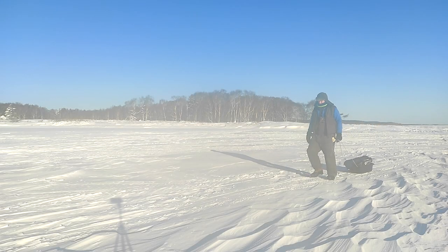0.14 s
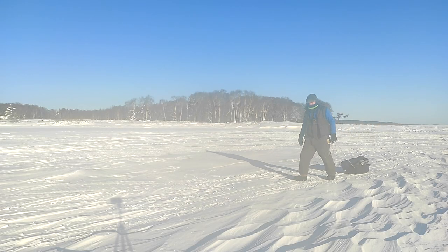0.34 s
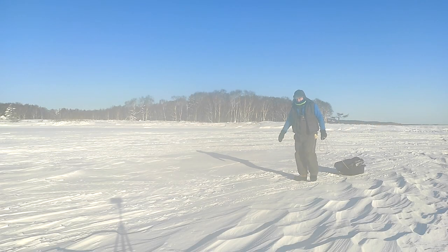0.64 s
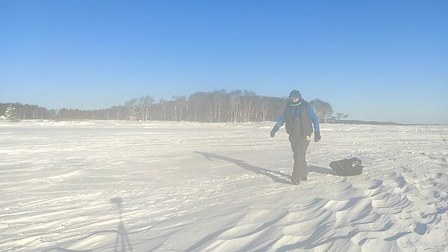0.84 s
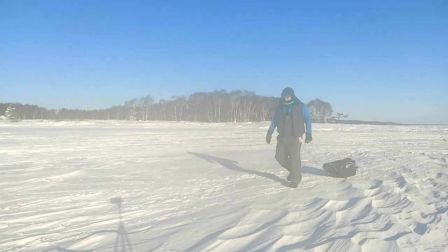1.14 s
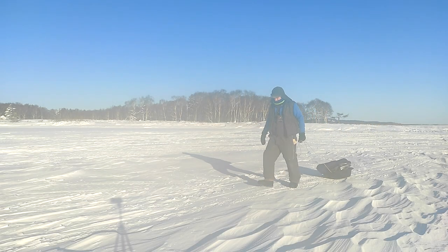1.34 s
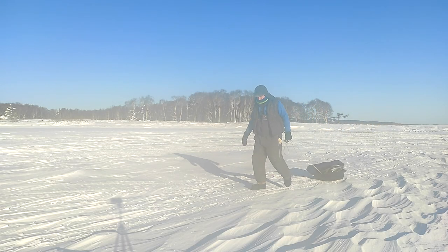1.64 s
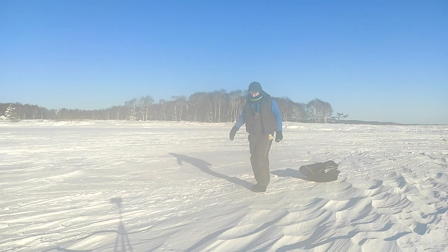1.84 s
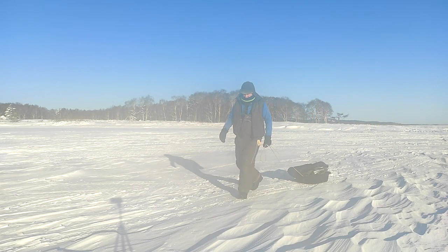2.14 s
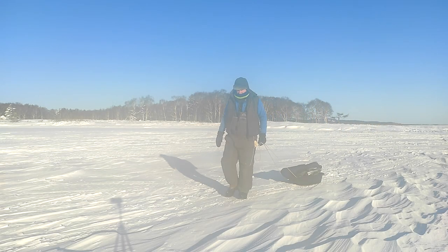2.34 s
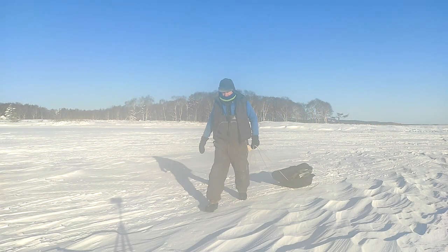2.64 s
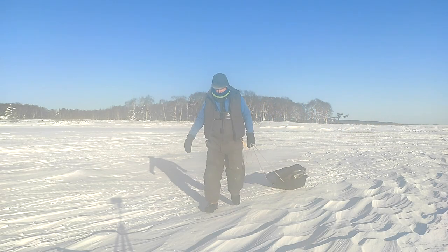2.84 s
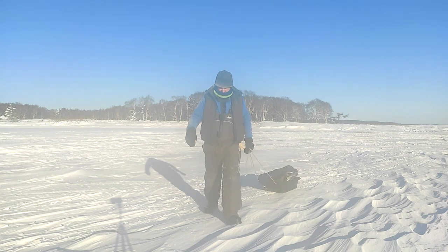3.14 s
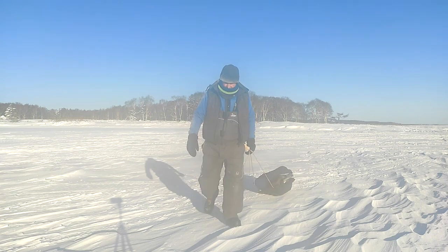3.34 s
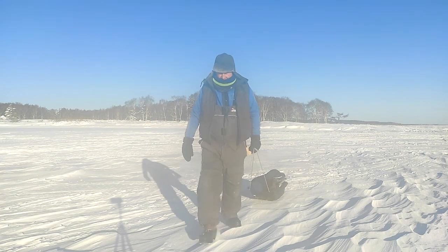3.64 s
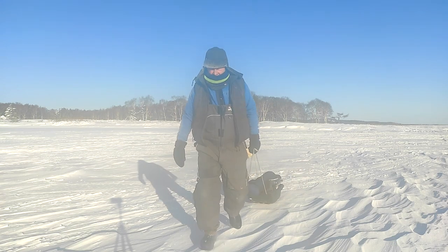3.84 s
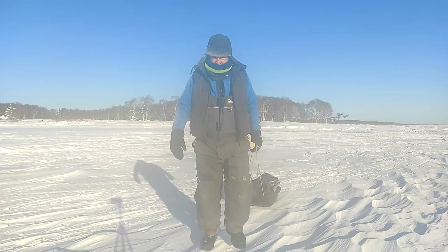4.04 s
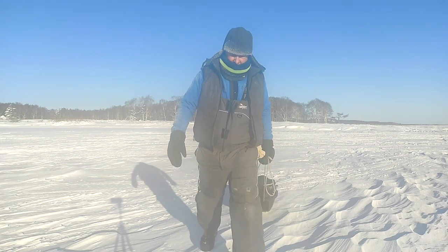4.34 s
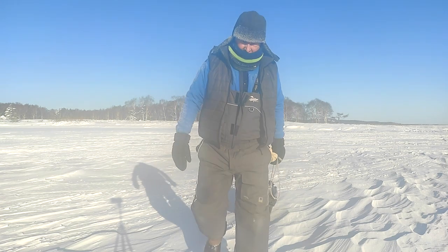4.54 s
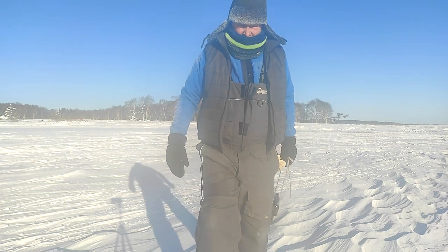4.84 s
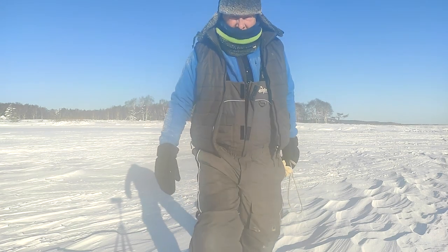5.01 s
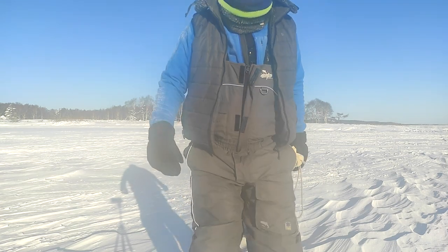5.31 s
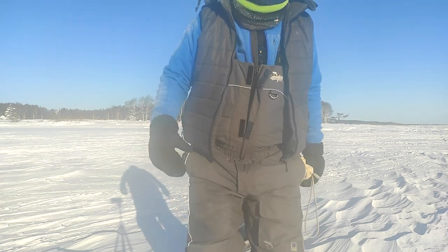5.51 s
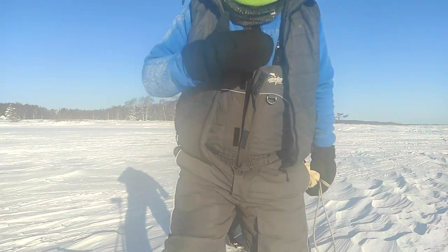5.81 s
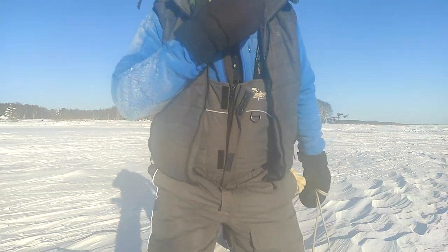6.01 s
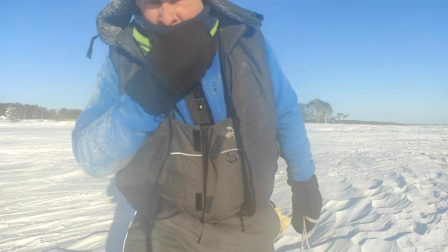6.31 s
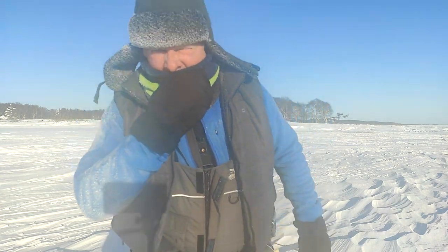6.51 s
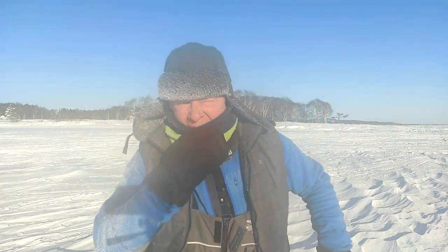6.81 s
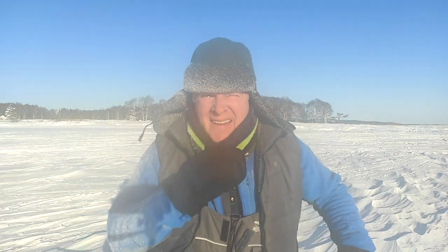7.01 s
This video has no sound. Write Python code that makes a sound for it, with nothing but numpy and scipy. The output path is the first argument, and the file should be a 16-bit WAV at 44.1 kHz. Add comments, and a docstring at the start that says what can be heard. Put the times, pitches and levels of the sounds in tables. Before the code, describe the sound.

A small stereo microphone stands on a frozen lake with a faint wind rumble. Heavy boots approach at about two steps a second, crusty snow crunching, a bag's jerky sandy hiss alongside, starting toward the left and moving to center. Dull crust thumps and sharp ice ticks punctuate. Close steps creak in rapid slips and squeak, while the hiss fades beneath coarse crunching. Dry, open air.

```python
"""From the start, light wind rumbles and a bag towed over wind-packed snow on a frozen lake hisses over the grains.
Boots come nearer: soles hiss, the crust crunches under each step, and now and then a slab gives way with a thump.
Single slips, then whole creaks, send waves through the crust, highs first and lows last; ice cracks sharply.
Later, packed snow squeaks and the boots come right up to the microphone. Shaped noise and short pushes make
all of it; the two microphone ports ring at their own pitch throughout, and there is no echo."""
import sys
import numpy as np
from scipy import signal
from scipy.fft import rfft, irfft, next_fast_len
from scipy.io import wavfile
from scipy.ndimage import map_coordinates

SR = 44100
rng = np.random.default_rng(int(sys.argv[2]) if len(sys.argv) > 2 else 0)


def master_out(mix):
    """Clip the mix to full scale and print it as 16-bit PCM to the path in sys.argv[1]."""
    frames = np.transpose(np.atleast_2d(mix))
    ceiling = np.clip(frames, -1, 1)
    pcm = np.round(ceiling * 32767).astype(np.int16)
    wavfile.write(sys.argv[1], SR, pcm)


N = 315831
TIME = np.arange(N) / SR
LEAD_S = .005  # silence ahead of each short sound, so that filters have room before it

# spectrum of grains that rub and spray: (pitch_hz, level_db)
POWDER_SPECTRUM = [(1500, -12.5), (3000, -27), (4200, -13.5), (5200, -4), (6300, -1), (7300, 3.5),
                   (8600, 0.5), (9400, -2.5), (10200, -10.5), (11200, -13.5), (15500, -18)]


def undb(db):
    """Decibels to gain."""
    return 10 ** (np.asarray(db) / 20)


def curves(table):
    """Draw straight lines between the rows of a table that starts with start_s; one curve per further column."""
    times_s, *columns = np.transpose(table)
    return [np.interp(TIME, times_s, column) for column in columns]


def unit(x):
    """Scale to rms 1."""
    return x / np.sqrt(np.mean(x ** 2))


def blow(x, db):
    """Scale a short sound so that its whole energy, packed into 10 ms, would have this level."""
    energy = np.mean(np.sum(x ** 2, axis=-1))
    return x * undb(db) / np.sqrt(energy / (SR / 100))


def filtered(x, response):
    """Apply a response, given as a function of frequency."""
    size = x.shape[-1]
    hz = np.arange(size // 2 + 1) * SR / size
    return irfft(rfft(x) * response(np.maximum(hz, 1)), size)


def colour(x, points):
    """Filter a sound through a curve of (pitch_hz, level_db) points."""
    hz, db = np.transpose(points)
    return filtered(x, lambda f: undb(np.interp(np.log(f), np.log(hz), db)))


def crust(x, lag_s):
    """Bending waves in the crust: delay falls with the root of frequency and is lag_s at 1 kHz."""
    return filtered(x, lambda f: np.exp(-4j * np.pi * lag_s * np.sqrt(1000 * f)))


def spread(shared, apart, width=0.98, left_db=4.0, even_hz=1100):
    """Make two channels: lows are alike and lean left, highs differ more the wider the source is."""
    angle = lambda f: np.arctan(width * np.minimum(f / 5000, 1) ** 0.68)
    sides = np.array([[1], [-1]])
    middle = filtered(shared, lambda f: np.cos(angle(f)))
    difference = filtered(apart, lambda f: np.sin(angle(f)))
    both = middle + sides * difference
    return filtered(both, lambda f: undb(sides * left_db / 2 / (1 + (f / even_hz) ** 2)))


def add(out, s, x):
    """Mix a short two-channel sound in at a time."""
    start = int(s * SR)
    out[:, start:start + x.shape[-1]] += x[:, :N - start]


def walk(rate):
    """Wander at random between new values drawn rate times a second, with a spread near 1."""
    knots = rng.standard_normal(int(N / SR * rate) + 2)
    return 1.77 * np.interp(TIME * rate, np.arange(len(knots)), knots)


def grains(rate, scatter_db, bed):
    """Two trains of fractures of uneven strength at the same random moments, over a fine bed of noise."""
    size = next_fast_len(N)
    hit = rng.random(size) < rate / SR
    strength = hit * undb(scatter_db * np.minimum(rng.exponential(size=size), 4))
    return (unit(strength) + bed) * rng.standard_normal((2, size))


def burst(length_s):
    """A cluster of tiny fractures that swells and dies, after a short lead-in of silence."""
    t = np.arange(2048) / SR - LEAD_S
    swell = np.sin(np.pi * np.clip(t / length_s, 0, 1))
    return swell * rng.standard_normal((2, len(t)))


def flickering(x, depth_db, rate=30, per_octave=4):
    """Narrow bands swell and fade at random, each on its own; ends at rms 1."""
    f, t, frames = signal.stft(x, SR, nperseg=512)
    place = np.meshgrid(per_octave * np.log2(1 + f / 300), rate * t, indexing="ij")
    chance = map_coordinates(rng.standard_normal(size=(64, 512)), place, order=1, mode="mirror")
    _, varied = signal.istft(frames * undb(depth_db * chance), SR)
    return unit(varied[:, :N])


def thump(hz, lag_s, octaves, left_db=3.5, order=2, debris=0):
    """One push on the crust, trailed by crumbling debris, is spread into a falling chirp on its way."""
    push = debris * burst(length_s=0.0047)[0]
    push[int(LEAD_S * SR)] += 1
    # octaves is the half-width of the band; a higher order gives it steeper edges
    wave = filtered(push, lambda f: np.exp(-.5 * np.abs(np.log2(f / hz) / octaves) ** order))
    return crust(wave, lag_s) * undb(np.array([[left_db], [-left_db]]) / 2)


def wind(level_db=-60, gust_db=2):
    """A light breeze rumbles on each port separately, as low noise whose level wanders."""
    # spectrum of the rumble: (pitch_hz, level_db)
    wind_spectrum = [(15, 6), (30, 6), (50, -3), (80, -9), (150, -6), (400, -26), (2000, -60)]
    rumble = colour(rng.standard_normal((2, next_fast_len(N))), wind_spectrum)[:, :N]
    return unit(rumble) * undb(level_db + gust_db * walk(3.77))


def scuff(since_s, length_s):
    """Something breaks loose at once, slides on a little softer and comes to rest."""
    attack_s, release_s, sag_db = 0.0078, 0.063, 2.5  # release_s is the time to fall by 20 dB
    attack = np.clip(since_s / attack_s, 0, 1)
    slide_db = -sag_db * np.clip(since_s / length_s, 0, 1)
    rest_db = -20 * np.maximum(since_s - length_s, 0) / release_s
    return attack * undb(slide_db + rest_db)


def footfall(since_s, rise_s, fall_s):
    """Weight comes on and rolls off; the level is 20 dB down a rise before and a fall after full weight."""
    step_curve = 1.61  # 1 = pointed swell, 2 = round
    return undb(-20 * np.maximum(-since_s / rise_s, since_s / fall_s) ** step_curve)


def effort():
    """How hard drag, scuffs and steps together work the snow: levels in dB of hiss, crunch and deep crunch."""
    # steady rub of the snow under bag and boots: (start_s, hiss_db, crunch_db, deep_crunch_db)
    drag_levels = [(0, -50, -57, -64.5), (.65, -50.5, -53, -61.5), (1.25, -56, -59.5, -71),
                   (1.8, -53.5, -47.5, -58.5), (2.9, -45, -47, -47), (3.45, -49, -48, -54.5),
                   (4, -51.5, -50, -54), (5.2, -52, -44.5, -49), (5.8, -56.5, -47, -57),
                   (6.25, -62, -50.5, -49.5), (6.5, -71, -46, -46.5), (7.16, -66, -47, -55.5)]
    # scuffs, as the bag jerks forward or a boot drags:
    # (start_s, length_s, hiss_db, crunch_db, deep_crunch_db)
    scuff_list = [(0, 0.038, -41, -46.5, -52.5), (0.143, 0.098, -50, -51.5, -58.5),
                  (0.238, .125, -43.5, -49, -55), (0.397, 0.076, -39.5, -41, -49),
                  (0.678, 0.16, -50, -47, -60), (0.795, 0.15, -46.5, -50.5, -47),
                  (1.081, .1, -43, -49.5, -47.5), (1.266, 0.076, -43, -42.5, -51.5),
                  (1.28, 0.018, -38.5, -50, -52), (1.361, 0.05, -44, -41, -45.5),
                  (1.419, 0.053, -36, -55, -61), (1.511, 0.14, -42.5, -44.5, -68),
                  (1.606, 0.096, -42, -51, -52), (1.71, .16, -38, -62, -62), (1.892, 0.1, -39.5, -46, -47),
                  (2.02, 0.065, -35.5, -40.5, -57), (2.123, 0.035, -37, -43, -47),
                  (2.179, 0.041, -37, -64, -66), (2.246, 0.023, -33.5, -35.5, -38.5),
                  (2.297, 0.053, -36.5, -52, -47), (2.387, 0.042, -39, -43, -65),
                  (2.477, 0.026, -35.5, -40.5, -54), (2.656, 0.063, -36, -39, -52),
                  (2.828, 0.13, -44, -45.5, -50), (3.035, 0.13, -40, -61, -58),
                  (3.298, 0.04, -39, -45, -49), (3.558, 0.038, -56, -40, -41),
                  (3.612, 0.016, -27, -41, -58), (4.028, 0.16, -48.5, -41.5, -50.5),
                  (4.186, 0.059, -32, -37.5, -42), (4.483, 0.19, -55, -44, -46),
                  (5.205, 0.11, -51, -48.5, -46.5), (5.371, 0.05, -37, -41, -39),
                  (5.574, 0.17, -52, -42.5, -42), (5.924, 0.038, -39, -35.5, -38),
                  (6.092, 0.063, -49, -35, -43), (6.279, 0.067, -44.5, -33.5, -44),
                  (6.552, 0.17, -51, -39.5, -40), (6.761, 0.037, -35.5, -29, -43),
                  (6.847, 0.13, -40, -29, -46), (7.146, 0.035, -52, -31, -53)]
    # footfalls and shifts of weight: (full_weight_s, rise_s, fall_s, hiss_db, crunch_db, deep_crunch_db)
    step_list = [(.36, 0.08, 0.11, -42, -40.5, -45.5), (.955, 0.13, 0.15, -63, -38.5, -45.5),
                 (1.473, 0.053, 0.14, -47, -37, -46.5), (2.085, .084, 0.1, -52, -42, -44.5),
                 (2.635, 0.1, 0.11, -43, -36.5, -39), (3.145, 0.14, 0.16, -30.5, -39.5, -55),
                 (3.2, 0.14, 0.23, -45, -37.5, -41.5), (3.681, 0.1, 0.099, -31.5, -34, -42.5),
                 (3.76, 0.063, 0.098, -28.5, -27, -35.5), (4.312, 0.081, .12, -24, -28.5, -43),
                 (4.37, 0.047, 0.1, -34, -28, -34.5), (4.909, 0.14, 0.077, -32.5, -27.5, -35),
                 (4.975, 0.11, 0.14, -37.5, -26, -32), (5.49, 0.17, 0.23, -41, -29.5, -33.5),
                 (6.022, 0.16, 0.11, -44, -28.5, -35), (6.402, 0.12, 0.058, -58, -30, -35.5),
                 (6.825, 0.086, 0.077, -48, -25, -36)]
    # the sole slides before the weight comes on; the deep crust yields after it
    sole_lead_s, deep_lag_s = 0.0067, 0.0038
    delays = np.array([[-sole_lead_s], [0], [deep_lag_s]])

    t = TIME[::32]  # a coarse clock is enough for slow levels
    times_s, *drag_db = np.transpose(drag_levels)
    power = undb([np.interp(t, times_s, db) for db in drag_db]) ** 2
    for s, rise_s, fall_s, *levels_db in step_list:
        power += (undb(levels_db)[:, None] * footfall(t - s - delays, rise_s, fall_s)) ** 2
    for s, length_s, *levels_db in scuff_list:
        power += (undb(levels_db)[:, None] * scuff(t - s, length_s)) ** 2
    return [np.interp(TIME, t, db) for db in 10 * np.log10(power)]


def sliding(level_db, closeness, gain_db=0, flutter_db=0.66):
    """Cold grains rub and break under the bag and the soles; close by, single coarse grains stand out."""
    fine = unit(spread(*grains(rate=5400, scatter_db=2.0, bed=1.0), width=0.55))[:, :N]
    coarse = unit(spread(*grains(rate=900, scatter_db=-2.5, bed=0), width=0.87))[:, :N]
    share = .55 * np.clip(closeness, 0, 1)  # coarse grains' share of the power; .55 right at the microphone
    rub = np.sqrt(1 - share) * fine + np.sqrt(share) * coarse
    hiss = flickering(colour(rub, POWDER_SPECTRUM), depth_db=3.5, per_octave=9)
    return hiss * undb(level_db + gain_db + flutter_db * walk(110))


def judder(rate, decay_s, steady, uneven=.35):
    """Snow gives way in quick, uneven jolts, each sudden and then fading; a gain with rms 1."""
    gaps_s = np.exp(uneven * rng.standard_normal(size=2048)) / rate
    starts = np.append(0, np.cumsum(gaps_s))
    since_s = TIME - starts[np.searchsorted(starts, TIME, side="right") - 1]
    return unit(steady + np.exp(-since_s / decay_s))


def crunching(crunch_db, deep_db, closeness, crunch_gain_db=-1.0, deep_gain_db=0.0, flutter_db=1.0, rumble_hz=150):
    """Worked crust breaks: dense fractures on top, brighter close by, and fewer, deeper ones below."""
    # spectra of the crunch far off, close by, and deep in the crust: (pitch_hz, level_db)
    far_spectrum = [(250, -24), (450, -10), (700, -4), (1020, 1), (1500, -4.5), (2400, -6), (3200, -6),
                    (4500, -11.5), (6000, -23), (15500, -57)]
    near_spectrum = [(250, -19), (420, -2), (700, -5.5), (1000, -5), (1220, -7), (1650, -1), (2500, -6),
                     (3100, -7), (3700, -10.5), (4600, -8.5), (6000, -11), (10000, -21), (15500, -36)]
    deep_spectrum = [(40, -30), (80, -15.5), (120, -6.5), (155, 0.5), (195, 0), (260, -0.5), (400, -4.5),
                     (600, -9.5), (1100, -35)]

    far = colour(spread(*grains(rate=2500, scatter_db=-1.0, bed=0.65), width=0.14), far_spectrum)
    near = colour(spread(*grains(rate=1000, scatter_db=1.0, bed=1.0), width=1.0), near_spectrum)
    far_wave = crust(far, lag_s=.006)[:, :N] / np.std(far)
    near_wave = crust(near, lag_s=.003)[:, :N] / np.std(near)
    share = np.clip(closeness, 0, 1)
    top = np.sqrt(1 - share) * far_wave + np.sqrt(share) * near_wave
    top = flickering(top, depth_db=3.0) * judder(rate=97, decay_s=0.018, steady=0.93)
    top = top * undb(crunch_db + crunch_gain_db + flutter_db * walk(90))

    deep = colour(spread(*grains(rate=600, scatter_db=1.0, bed=0.49), width=0.71), deep_spectrum)
    deep = crust(deep, lag_s=0.00401)
    # the deep crunch has less of its lowest rumble when the steps are close
    rumble = filtered(deep, lambda f: 1 / (1 + (f / rumble_hz) ** 6))
    deep = deep[:, :N] - share * rumble[:, :N]
    return top + flickering(deep, depth_db=4.5) * undb(deep_db + deep_gain_db)


def breaking(crack_gain_db=-2.0, slab_gain_db=0, crack_top_hz=9400):
    """Slabs of crust collapse with a dull thump; ice cracks sharply, each one break with a little debris."""
    # slabs that give way with a falling thump: (start_s, level_db, pitch_hz, travel_lag_at_1_khz_s)
    slab_list = [(0.357, -41, 253, 0.0088), (0.953, -42, 420, 0.0054), (2.058, -29.5, 227, 0.012),
                 (2.248, -38.5, 745, 0.0078), (3.102, -33, 302, 0.0072), (3.193, -36.5, 201, 0.00536),
                 (4.408, -30, 560.4, 0.00357), (4.964, -33, 230, .004), (5.52, -37, 200, 0.0047)]
    # brittle ice grains that crack: (start_s, level_db before crack_gain_db, lowest_hz)
    crack_list = [(2.252, -29, 6540), (2.255, -21, 7100), (2.256, -34, 6840), (2.259, -30, 6500),
                  (2.262, -27, 6900), (2.2698, -31, 6900), (2.2834, -34, 6800), (2.695, -33, 6500),
                  (3.2406, -35, 5970), (4.304, -21, 4770), (4.311, -28, 4900), (4.3180, -25, 4940),
                  (4.337, -33, 5500), (4.343, -35, 5470), (6.8209, -43, 4000)]

    out = np.zeros((2, N))
    for s, db, hz, lag_s in slab_list:
        add(out, s - LEAD_S, blow(thump(hz, lag_s, octaves=0.59), db + slab_gain_db))
    for s, db, low_hz in crack_list:
        fracture = .17 * burst(length_s=.002)
        fracture[0, int((LEAD_S + .0004) * SR)] += 2  # the break itself, shared by both channels
        band = lambda f: 1 / (1 + (f / crack_top_hz) ** 12) / (1 + (low_hz / f) ** 10)
        crack = filtered(spread(*fracture, width=0.94), band)
        add(out, s - LEAD_S, blow(crack, db + crack_gain_db))
    return out


def slips():
    """Every slip, with its length, levels and pitches: single ones, and creaks with evenly changing gaps."""
    # single slips of the crust, levels before the gains in creaking():
    # (start_s, spray_db, snap_db, ring_db, thud_db)
    single_list = [(1.074, -53, -45, -45, -50), (3.8265, -33.5, -41, -37, -48),
                   (3.9272, -40.5, -35.5, -41, -42), (4.0252, -42.5, -36, -42, -58),
                   (4.056, -35.5, -35.5, -36, -49), (4.0866, -38.5, -37, -35, -41),
                   (4.113, -37, -34, -31.5, -39), (4.1392, -36, -36, -37.5, -41),
                   (4.1662, -34, -32.5, -35.5, -44), (4.189, -38, -39, -37.5, -51),
                   (4.2173, -37, -33, -35, -57), (4.2489, -35, -31, -28.5, -40),
                   (4.439, -42, -38, -43, -47), (4.452, -37, -36, -38, -39),
                   (4.457, -39.5, -31, -33, -35.5), (4.483, -40, -34, -48, -46),
                   (4.498, -42, -38, -45, -42), (4.519, -40, -30.5, -42, -43),
                   (4.538, -42.5, -34, -45, -41), (4.5545, -40, -33, -48, -47), (4.576, -41, -33, -46, -40),
                   (4.5976, -41, -32, -45, -44), (4.622, -41, -32, -46, -46), (4.67, -41.5, -30, -47, -54),
                   (4.73, -39.5, -30, -44, -49), (4.762, -38, -30.5, -39, -44),
                   (4.79, -37.5, -30, -34, -38), (4.814, -37.5, -27.5, -39, -42),
                   (5.044, -52, -47, -35, -36), (5.0916, -47, -38, -41, -39), (5.3869, -40, -30, -31, -43),
                   (5.595, -47, -37, -25, -33), (5.8364, -47, -34, -44, -31.5),
                   (6.0627, -45, -36, -39, -30.5), (6.1007, -49, -36, -40, -42),
                   (6.123, -50, -30, -36, -35.5), (6.1552, -51, -30, -38, -44),
                   (6.183, -48, -29, -33.5, -37), (6.2107, -53, -36, -38.5, -39),
                   (6.2361, -51.5, -42, -37.5, -40), (6.284, -51, -34, -36, -36.5),
                   (7.005, -51, -36, -35.5, -37)]
    # creaks, runs of slips under a loaded boot, levels before the same gains:
    # (first_slip_s, last_slip_s, mean_gap_s, last_gap / first_gap, swell_from_first_to_last_db,
    #  spray_db, snap_db, ring_db, ring_pitch_hz, ring_half_width_octaves, thud_db, thud_pitch_hz)
    creak_list = [(3.199, 3.253, 0.0097, 1.6, -4, -41, -48, -64, 1750, .82, -40, 500),
                  (3.542, 3.621, 0.019, 1.2, 1.5, -44, -36.5, -49, 1750, 1, -50, 590),
                  (3.682, 3.702, 0.0066, .78, -3, -40, -46, -34.5, 1745, 0.83, -66, 596),
                  (3.787, 3.796, .007, 1.0, -4, -38, -46, -34, 1750, .6, -45, 599),
                  (3.841, 3.8707, 0.018, 2.4, -2.5, -44.5, -39, -41, 1732, 0.63, -60, 621.5),
                  (4.952, 5.028, 0.0098, 1.34, -4, -52, -42, -38.5, 1750, 0.46, -35.5, 450),
                  (5.308, 5.354, 0.023, 0.79, 2, -45.5, -36.5, -41.5, 1750, 0.89, -41, 580),
                  (5.453, 5.508, 0.0063, 1.01, 0, -55, -50, -33, 1752, 0.53, -40, 560),
                  (5.515, 5.5755, 0.013, 2.4, 1, -48.5, -42, -32.5, 1750, 0.58, -33.5, 570),
                  (5.62, 5.7085, 0.015, 0.97, 1, -46.5, -42, -33.5, 1850, 0.61, -35.5, 600),
                  (6.447, 6.4686, .021, 1.0, -3, -61, -42, -43, 1746, 0.62, -39, 519),
                  (6.514, 6.5543, 0.0104, .55, -5.5, -56.5, -35, -36.5, 1740, 0.27, -38.5, 475.3),
                  (6.561, 6.616, 0.0058, 1.05, 1, -58, -37.5, -40, 1760, 0.35, -44, 440.3),
                  (6.6253, 6.7454, .012, 1.08, -1.5, -59, -39.5, -37.5, 1750, 0.29, -37.5, 420),
                  (6.785, 6.8217, 0.0051, 0.74, 1, -56, -43, -33, 1866, 0.65, -35.5, 670),
                  (6.88, 6.931, 0.0095, 1.17, 3, -54, -45, -36.5, 1797, .5, -45, 560),
                  (6.945, 6.994, .0087, 1.32, 4, -66, -43, -35, 1696, 0.65, -39, 516)]
    single_ring_hz, single_ring_octaves, single_thud_hz = 1600, 0.64, 670
    # within a creak, the snow slides for this share of the mean gap, up to a longest time, then sticks
    slide_share, longest_s = .28, .0045
    jitter_s, scatter_db, scatter_octaves = .0003, 1.1, 0.13  # from slip to slip within a creak

    rows = []
    for s, spray_db, snap_db, ring_db, thud_db in single_list:
        rows.append((s, longest_s, spray_db, snap_db, ring_db, single_ring_hz, single_ring_octaves,
                     thud_db, single_thud_hz))
    for (first_s, last_s, gap_s, slowing, swell_db, spray_db, snap_db, ring_db, ring_hz, ring_octaves,
         thud_db, thud_hz) in creak_list:
        gap_count = max(round((last_s - first_s) / gap_s), 1)
        gaps = slowing ** np.linspace(0, 1, gap_count)
        length_s = min(slide_share * gap_s, longest_s)
        for share in np.append(0, np.cumsum(gaps)) / gaps.sum():
            late, force, pitch = rng.standard_normal(3)
            s = first_s + share * (last_s - first_s) + jitter_s * late
            db = swell_db * (share - .5) + scatter_db * force
            rows.append((s, length_s, spray_db + db, snap_db + db, ring_db + db, ring_hz, ring_octaves,
                         thud_db + db, thud_hz * 2 ** (scatter_octaves * pitch)))
    return rows


def creaking(spray_gain_db=3.5, snap_gain_db=-3.5, ring_gain_db=0, thud_gain_db=0, click=4.0, tint_db=3.5,
             ring_scatter=0.055):
    """Snow sticks and slips: each slip sprays grains, snaps, rings the packed snow, and ends in a falling thud."""
    # spectrum of the snap, tinted at random for each slip: (pitch_hz, level_db)
    snap_spectrum = [(600, -7), (1200, -5), (1750, 1.5), (2550, -7.5), (3300, -4.5), (5000, -8),
                     (10000, -33)]
    break_share = .3  # the main break, which rings the packed snow under the sole, comes this far into a slip
    ring_debris, thud_debris = .07, .03  # how much grains crumble after the main break
    # travel lag of the thud at 1 kHz, and how much of it the spray shares
    thud_lag_s, thud_head_start_s = .0075, 0.00495
    tail_hz, tail_db = 200, -12  # the slowest waves trail each thud; tail_db is relative to its main part

    out = np.zeros((2, N))
    for s, length_s, spray_db, snap_db, ring_db, ring_hz, ring_octaves, thud_db, thud_hz in slips():
        break_s = break_share * length_s
        spray = colour(spread(*burst(length_s), width=0.48), POWDER_SPECTRUM)

        shared, apart = burst(1.41 * length_s)
        shared[int((LEAD_S + break_s) * SR)] += 2 * click  # the main break within the cluster
        tint = [(hz, db + tint_db * rng.standard_normal()) for hz, db in snap_spectrum]
        snap = crust(colour(spread(shared, apart, width=1.0), tint), lag_s=0.001604)

        scattered_hz = ring_hz * np.exp(ring_scatter * rng.standard_normal())
        ring = thump(scattered_hz, lag_s=0.001407, octaves=ring_octaves, left_db=2.5, order=6,
                     debris=ring_debris)

        thud = blow(thump(thud_hz, thud_lag_s, octaves=0.61, debris=thud_debris), 0)
        thud = thud + blow(thump(tail_hz, thud_lag_s, octaves=0.46), tail_db)

        add(out, s - LEAD_S, blow(spray, spray_db + spray_gain_db) + blow(snap, snap_db + snap_gain_db))
        add(out, s - LEAD_S + break_s, blow(ring, ring_db + ring_gain_db))
        add(out, s - LEAD_S - thud_head_start_s, blow(thud, thud_db + thud_gain_db))
    return out


def squeaking(gain_db=0, width=0.16, slip_hz=75, throb=0.46):
    """Packed snow squeaks as the sole settles: quick slips blur into a rough band that sinks as it packs."""
    # (start_s, length_s, first_pitch_hz, last_pitch_hz, level_db)
    squeak_list = [(3.151, 0.046, 880, 448, -37.5), (4.312, 0.1, 934, 647, -36.5),
                   (4.881, 0.23, 1910, 1657, -40.5), (5.453, 0.04, 1914, 1352, -31.5),
                   (6.78, 0.052, 1998, 1897, -28), (6.826, 0.043, 1011, 704, -35),
                   (6.939, 0.0442, 1750, 1097, -34.5)]
    out = np.zeros((2, N))
    for s, length_s, first_hz, last_hz, db in squeak_list:
        u = np.linspace(0, 1, int(length_s * SR))  # progress through the squeak
        noise = rng.standard_normal(size=(2, 16384))
        # two slow noises, shifted up to the gliding pitch, make a band around it
        real, imag = filtered(noise, lambda f: 1 / (1 + (f / (width * first_hz)) ** 4))[:, :len(u)]
        phase = 2 * np.pi * np.cumsum(first_hz * (last_hz / first_hz) ** u) / SR
        slip_rate = slip_hz * (1 + 0.15 * walk(71.0)[:len(u)])
        throbbing = 1 + throb * np.cos(2 * np.pi * np.cumsum(slip_rate) / SR)
        band = (real * np.cos(phase) + imag * np.sin(phase)) * throbbing * np.sqrt(u * (1 - u))
        add(out, s, spread(unit(band), 0 * band) * undb(db + gain_db))
    return out


def shaded(x, closeness):
    """Boots that come in under the microphone sound duller: they lose some treble."""
    shade_hz, shade_db, shade_from = 3030, -2.5, 0.74  # shade_from is the closeness where it sets in
    dull = filtered(x, lambda f: undb(shade_db / (1 + (shade_hz / f) ** 10)))
    share = np.clip((closeness - shade_from) / max(1 - shade_from, .01), 0, 1)
    return x + share * (dull - x)


def scene():
    """The walker starts to one side, so sound reaches the left port first, and ends nearly straight ahead."""
    # the approach: (start_s, lead_of_left_channel_s, added_left_minus_right_of_hiss_db, closeness 0 to 1)
    path = [(0, .000185, 3, 0.05), (1.5, .000145, 2.5, 0.04), (2.6, .000095, 4, 0), (3.2, 0, -1.5, 0.37),
            (4.3, 0, -2.5, 0.5), (5.6, .00002, 1, 0.67), (6.2, -.00005, -6.5, 0.86),
            (7.1, -.00004, -3, 0.87)]
    lead_s, pan_db, closeness = curves(path)
    hiss_db, crunch_db, deep_db = effort()
    hiss = sliding(hiss_db, closeness) * undb(np.array([pan_db, -pan_db]) / 2)
    boots = shaded(crunching(crunch_db, deep_db, closeness) + creaking(), closeness)
    left, right = hiss + boots + breaking() + squeaking()
    right = map_coordinates(right, [(TIME - lead_s) * SR], order=5, mode="nearest")
    return np.array([left, right]) + wind()


def record(dry):
    """Each port rings at its own pitch, the right one turning over in phase; peaks are rounded, the top is cut."""
    # resonance of each microphone port, left then right: (pitch_hz, width_hz, boost_db)
    port_list = [(8543, 750, 17), (7020, 936, 14)]
    ceiling, top_hz = .75, 15900  # ceiling: the level that rounded peaks approach
    out = []
    for x, (hz, width_hz, boost_db) in zip(dry, port_list):
        ring = signal.lfilter(*signal.iirpeak(hz, hz / width_hz, fs=SR), x)
        out.append(x + (undb(boost_db) - 1) * ring)
    # the right port's phase turns by half a cycle around 8200 Hz
    out[1] = filtered(out[1], lambda f: np.exp(-1j * np.pi / (1 + (8200 / f) ** 8)))
    rounded = ceiling * np.tanh(np.array(out) / ceiling)
    return signal.sosfilt(signal.ellip(12, .2, 90, top_hz, fs=SR, output="sos"), rounded)


dry = scene()
out = record(dry)
master_out(out)
```